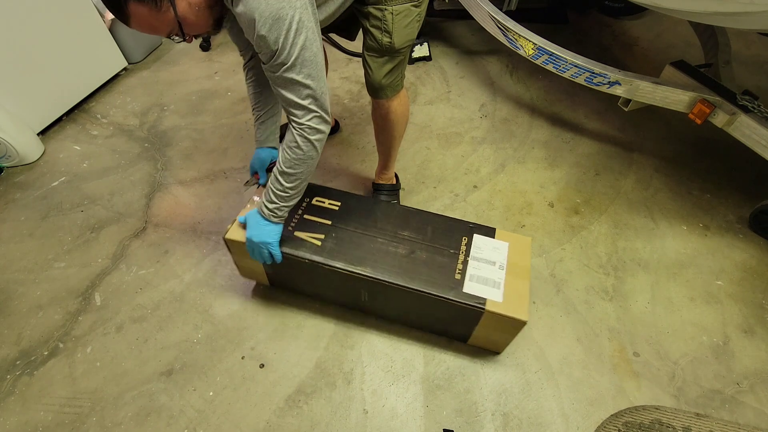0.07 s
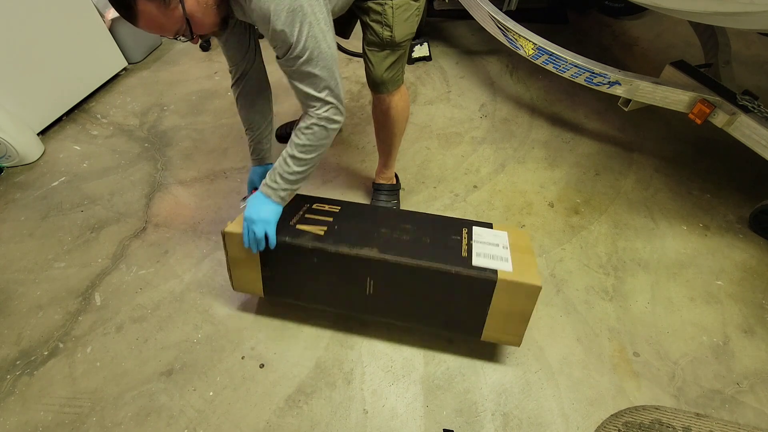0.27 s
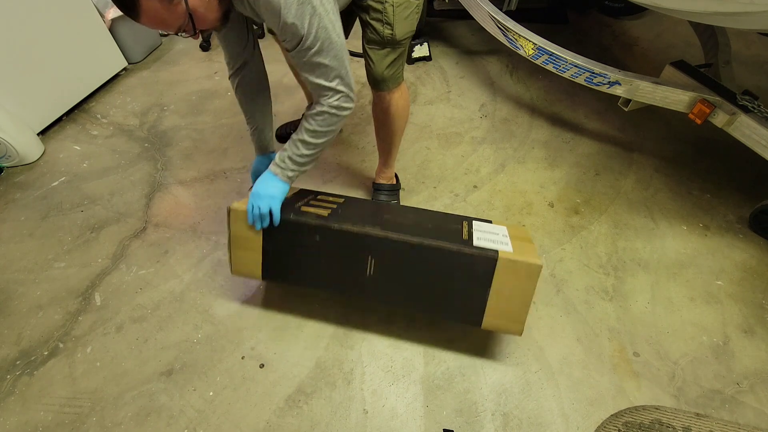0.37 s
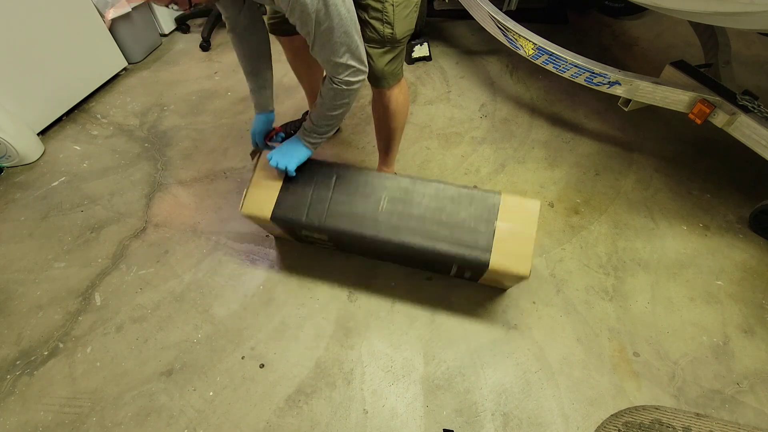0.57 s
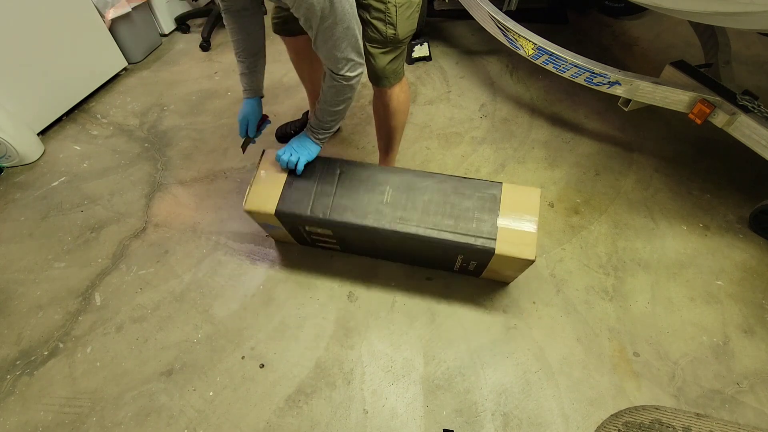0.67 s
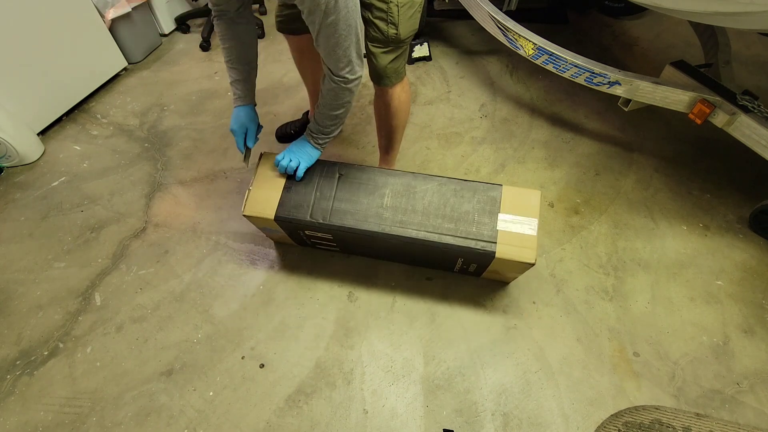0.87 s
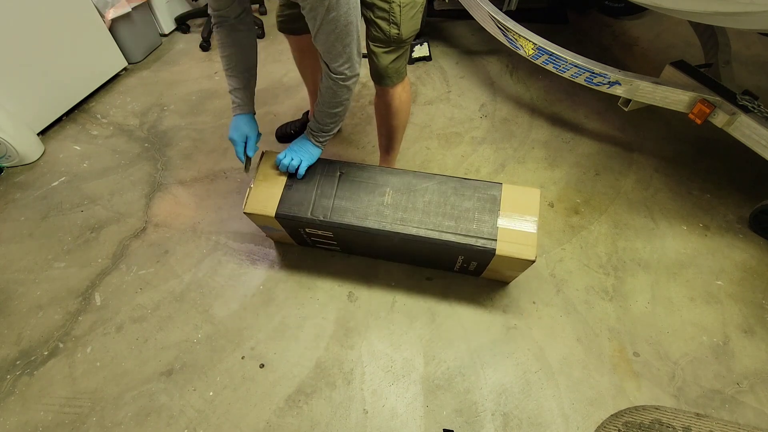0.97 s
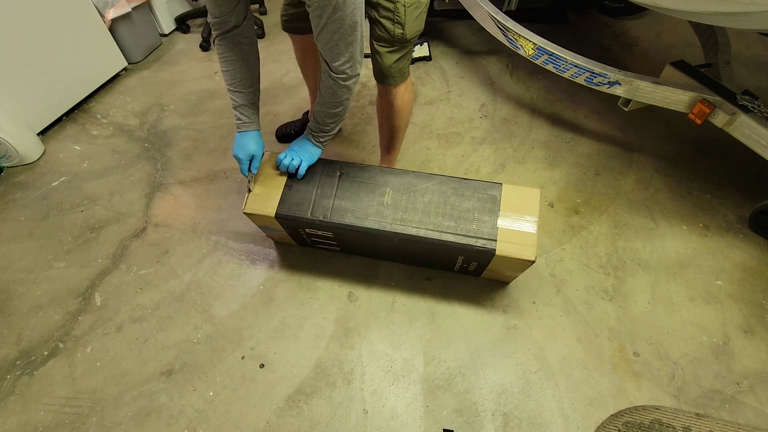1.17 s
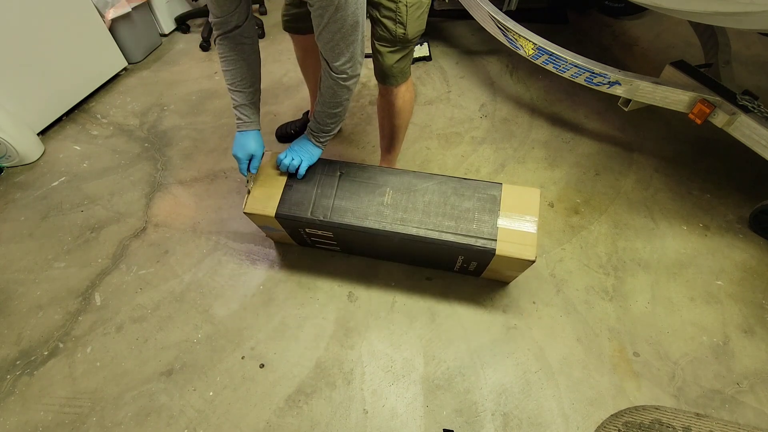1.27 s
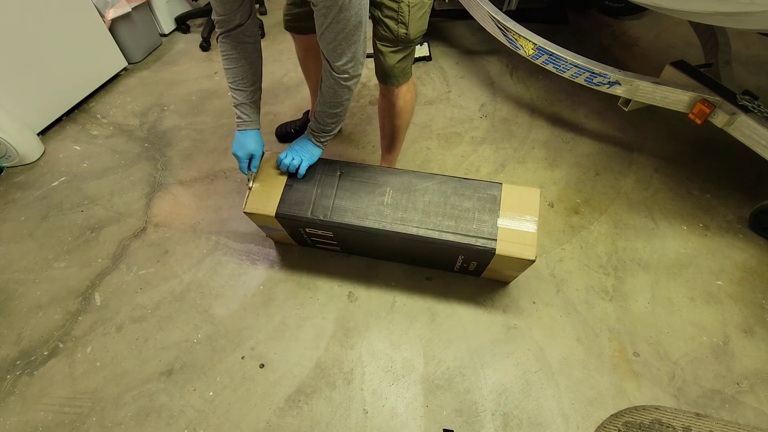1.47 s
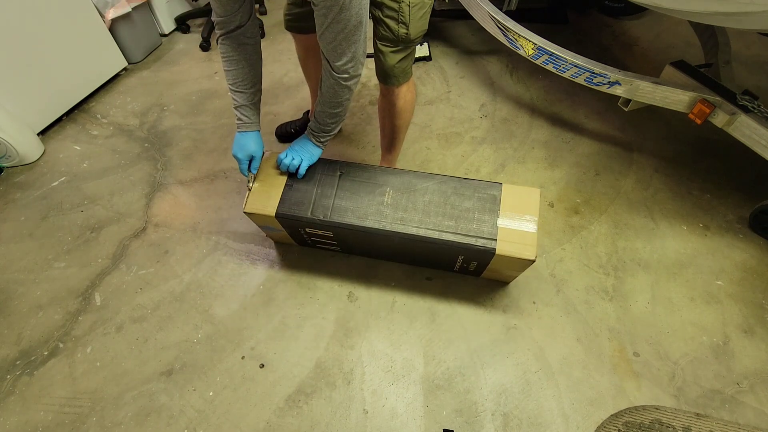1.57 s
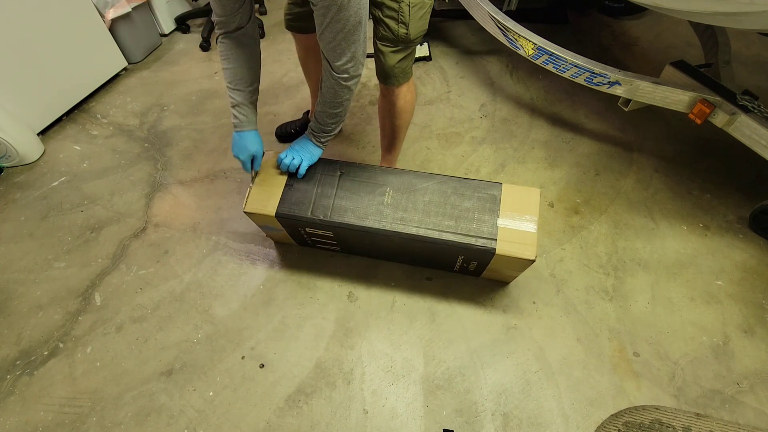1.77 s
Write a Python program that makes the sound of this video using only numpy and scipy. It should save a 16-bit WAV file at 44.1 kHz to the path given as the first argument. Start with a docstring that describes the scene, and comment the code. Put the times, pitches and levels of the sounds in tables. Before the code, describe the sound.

A cardboard box slaps down on its edge, slides under gloved hands and lands with a hollow thud in a hard-walled garage. Faint taps and blade skids come next, then tape begins tearing in tiny snaps over a quiet rumble.

```python
"""A garage with a concrete floor. A long cardboard box is rolled over: it slaps down on an edge, slides
under gloved hands with a hiss of catching fibres, tips and lands with a hollow thud of ringing walls
and squeezed air. Light knocks, ticks and skids follow as a blade is set to the tape and starts to tear
it in tiny snaps. The hard room rings briefly over a quiet rumble."""
import sys
import numpy as np
from scipy import signal
from scipy.fft import rfft, irfft, next_fast_len
from scipy.io import wavfile

SR = 44100
rng = np.random.default_rng(int(sys.argv[2]) if len(sys.argv) > 2 else 0)


def transcribe(u):
    """Save the signal u as a 16-bit wav file named by the first command-line argument.

    u: samples, shape (n,) or (channels, n), limited to [-1, 1]; the rate is SR.
    q: integer samples, one column per channel.
    """
    v = np.clip(np.atleast_2d(u).T, -1, 1)
    q = np.round(v * 32767).astype(np.int16)
    wavfile.write(sys.argv[1], SR, q)


N = 79380


def amp(db):
    """Decibels to gain."""
    return 10 ** (np.asarray(db) / 20)


def unit(x):
    """Scaled to rms 1."""
    return x / np.sqrt(np.mean(x ** 2) + 1e-20)


def along(points, hz):
    """A curve of (frequency, value) points read on a log axis."""
    freqs, values = np.transpose(points)
    return np.interp(np.log(hz + 1), np.log(freqs + 1), values)


def filtered(x, response):
    """x shaped by a frequency response."""
    n = x.shape[-1]
    size = next_fast_len(n + SR // 4)
    return irfft(rfft(x, size) * response(np.fft.rfftfreq(size, 1 / SR)), size)[..., :n]


def coloured(x, eq):
    """x through an EQ curve, at rms 1."""
    return unit(filtered(x, lambda hz: amp(along(eq, hz))))


def grains(rate, spread_db):
    """Tiny snaps at random times with log-normal sizes."""
    chance, size, sign = rng.random(N), rng.standard_normal(N), rng.choice([-1, 1], N)
    return (chance < rate / SR) * sign * amp(spread_db * size)


def add(track, start_s, sound):
    """Lay a sound into a track."""
    i = max(0, round(start_s * SR))
    track[..., i:i + sound.shape[-1]] += sound[..., :N - i]


# How alike the room is left and right: (frequency [Hz], correlation [0..1])
ROOM_LIKENESS = [(30, 0.59), (150, 1), (300, 0.18), (700, 0), (1500, 0), (15000, 0.069)]

def diffuse(pair):
    """Two unrelated signals become a room's left and right: centred bass, wide treble."""
    def mid_side_gains(hz):
        angle = np.arccos(np.clip(along(ROOM_LIKENESS, hz), -1, 1)) / 2
        return np.array([np.cos(angle), np.sin(angle)])
    mid, side = filtered(pair, mid_side_gains)
    return np.array([mid + side, mid - side])


# Reverb decay: (frequency [Hz], t60 [s])
ROOM_DECAY = [(50, 0.7), (200, 0.31), (1000, 0.44), (4000, 0.29), (8000, 0.36), (15000, 0.16)]
# Reverb against the direct sound: (frequency [Hz], level [dB])
ROOM_SEND = [(50, -16), (150, -6), (400, -2), (1200, -1.5), (3000, 2), (15000, 0)]
PREDELAY_S, LEFT_LEADS_S, BALANCE_DB = .0035, .00013, -0.5
ECHO_LEFT_S, ECHO_RIGHT_S, ECHO_DB = .0054, .0039, -11.5

def garage(x):
    """The direct sound, a first bounce off a nearby surface and a short tail from the hard walls."""
    hz, t, noise = signal.stft(diffuse(rng.standard_normal((2, SR // 2))), SR, nperseg=256)
    t60 = along(ROOM_DECAY, hz)[:, None]
    gain = amp(along(ROOM_SEND, hz))[:, None] * np.sqrt(2 * np.log(1000) / (t60 * SR))
    tail = signal.istft(noise * gain * np.exp(-np.log(1000) * t / t60), SR, nperseg=256)[1]
    tail = np.pad(tail, ((0, 0), (round(PREDELAY_S * SR), 0)))
    sides = np.array([[1], [-1]])
    direct = amp(BALANCE_DB * sides) * filtered(x, lambda f: np.exp(1j * np.pi * f * LEFT_LEADS_S * sides))
    echo = filtered(x, lambda f: np.exp(-2j * np.pi * f * np.array([[ECHO_LEFT_S], [ECHO_RIGHT_S]])))
    return direct + amp(ECHO_DB) * echo + signal.fftconvolve(x[None], tail, axes=1)[:, :len(x)]


# Room tone: (frequency [Hz], gain [dB])
RUMBLE_EQ = [(20, -13.5), (45, -1), (70, 3.5), (110, -6.5), (200, -2.5), (400, -12), (750, -10),
             (1200, -19.5), (3000, -23.5), (7000, -28), (9000, -39), (16000, -34.5)]

def room_tone(level_db=-64.5):
    """A steady bed of quiet, diffuse rumble."""
    return amp(level_db) * coloured(diffuse(rng.standard_normal((2, N))), RUMBLE_EQ)


def ring(modes, scatter_db, longest_t60_s=.28):
    """Struck resonances: damped sines of alternating sign, their levels varied on each call."""
    out, t = np.zeros(SR // 2), np.arange(SR // 2) / SR
    for k, (hz, db, t60) in enumerate(modes):
        decay = amp(db + scatter_db * rng.standard_normal() - 60 * t / min(t60, longest_t60_s))
        out += (-1) ** k * decay * np.sin(2 * np.pi * hz * t)
    return out


# The box's hollow body: (frequency [Hz], level [dB], t60 before ring's cap [s])
BOX_MODES = [(150.2, -4, 0.18), (179.3, -7.5, 0.32), (209.4, 1, 0.21), (253.4, 2, 0.14), (291.3, -6, 0.204),
             (320, -17, 0.171), (355.3, 0.5, .28), (465, -5, .18), (489.4, -10.5, 0.12), (556.3, -5.5, .2),
             (691.6, -5, 0.11), (747, -12.5, 0.1), (780, 2, 0.07), (880, -4, 0.2), (1102, -18, 0.13)]
# Air squeezed under and inside the box: (frequency [Hz], level [dB], t60 [s])
AIR_MODES = [(50.4, -7.5, 0.26), (72.7, -3.5, 0.16), (116.3, -2, 0.044)]
# Dense flexing of the walls: (frequency [Hz], gain [dB])
PANEL_EQ = [(60, -31), (150, 4), (400, 2), (800, -6), (1150, 0), (1600, -4), (3000, -25.5), (8000, -39)]
# Crushed card: (frequency [Hz], gain [dB])
CRUNCH_EQ = [(200, -22.5), (800, -11.5), (2500, -3.5), (4500, -3), (7200, -6.5), (9500, -14),
             (13000, -10.5), (16000, -16)]
# Hits on the box: (time [s], slap level [dB], slap pitch [Hz], hollow level [dB],
# hollow low-pass [Hz], thump level [dB], crunch level [dB])
BOX_HITS = [(0.0, -43, 273, -39, 577, -44.5, -41), (0.2203, -8, 451, -25.5, 1900, -32, -32.5),
            (0.2273, -25, 970, -39, 1980, -41, -54), (0.2296, -19, 470, -32, 900, -58, -45),
            (0.2340, -21, 132.4, -38, 406, -26.5, -57.5), (0.2440, -21.5, 240, -31.5, 500, -42, -56),
            (0.2537, -19, 146, -35, 260, -40, -41.5), (0.5704, -35.5, 495, -39, 1100, -39, -58),
            (0.5960, -34, 280, -41, 690, -32.5, -40.5), (0.6880, -35, 505, -37.5, 1013, -60, -41),
            (0.6950, -26.5, 209, -30.5, 400, -26.5, -43), (0.7112, -23.5, 227, -31, 900, -39, -37),
            (0.7190, -25, 80.8, -43, 397, -26, -56), (0.7430, -37, 125.7, -36.5, 350, -47, -64),
            (1.1140, -42, 357, -43.5, 706, -53, -52), (1.1400, -44, 169, -51, 497, -69, -70.5),
            (1.2391, -47.5, 793, -59, 1790, -78, -81), (1.2416, -44, 203.7, -62, 500, -72, -60.5),
            (1.5630, -50.5, 450, -55, 1200, -91.5, -76.5)]
SLAP_CYCLES, SLAP_BEND_CYCLES = 0.59, 0.73
MODES_DB, PANEL_DB, PANEL_T60_S, CRUNCH_T60_S = -8.5, 0.5, .11, 0.061
FIBRES_PER_S, FIBRE_SPREAD_DB = 9000, 4

def knocks():
    """Each blow slaps one wall, rings the hollow box, pushes out air and crushes a little card."""
    out, t = np.zeros((2, N)), np.arange(SR // 2) / SR
    for s, slap_db, slap_hz, hollow_db, lowpass_hz, thump_db, crunch_db in BOX_HITS:
        cycles = slap_hz * t
        age = cycles / SLAP_CYCLES  # the slap's envelope peaks at 1
        bend = SLAP_BEND_CYCLES * (1 - np.exp(-age))  # starts sharp, falls toward its pitch
        slap = -age * np.exp((1 - age ** 2) / 2) * np.sin(2 * np.pi * (cycles + bend))
        panels = coloured(rng.standard_normal(len(t)), PANEL_EQ) * amp(PANEL_DB - 60 * t / PANEL_T60_S)
        hollow = (panels + amp(MODES_DB) * ring(BOX_MODES, scatter_db=2)) * (1 - np.exp(-t / 0.0017))
        hollow = signal.lfilter(*signal.butter(2, lowpass_hz, fs=SR), hollow)
        thump = ring(AIR_MODES, scatter_db=3.5) * (1 - np.exp(-t / 0.0036))
        fibres = grains(FIBRES_PER_S, FIBRE_SPREAD_DB)[:len(t)]
        crunch = coloured(fibres, CRUNCH_EQ) * amp(-60 * t / CRUNCH_T60_S)
        hit = amp(slap_db) * slap + amp(hollow_db) * hollow + amp(thump_db) * thump
        add(out, s, garage(hit + amp(crunch_db) * crunch))
    return out


# Bright surface friction: (frequency [Hz], gain [dB])
HISS_EQ = [(300, -20.5), (1500, -14.5), (2600, -4.5), (4200, -4.5), (6200, 0), (7400, 0.5), (8600, -10),
           (11000, -6.5), (12800, -6), (16000, -6)]
# The walls' dull answer: (frequency [Hz], gain [dB])
BODY_EQ = [(80, -32.5), (200, -1.5), (350, -5.5), (570, 1.5), (900, -0.5), (1450, -5.5), (1590, -7),
           (1720, -3.5), (2400, -7), (5000, -12), (12000, -36)]
# Card sliding on gloves and floor: (peak time [s], rise [s], fall [s], hiss level [dB], body level [dB])
STROKES = [(0.005, 0.035, 0.015, -109, -51), (0.083, 0.064, 0.041, -46, -50.5),
           (0.217, 0.043, 0.05, -52.5, -45.5), (0.323, 0.016, 0.072, -47, -46.5),
           (0.41, 0.054, 0.056, -42, -41), (0.541, 0.012, 0.009, -51, -56),
           (0.618, 0.047, 0.027, -52, -44.5), (0.714, 0.039, 0.026, -47.5, -43.5),
           (1.49, 0.016, 0.043, -86, -85), (1.605, 0.11, 0.079, -76.5, -70.5)]
SING_HZ, SING_WIDTH_HZ, SING_DB = 1556, 31, -14

def slides(patches=6):
    """Fibres catch and slip as each stroke swells and fades; a stiff edge sings as it is rubbed."""
    t, hiss, body = np.arange(N) / SR, np.zeros(N), np.zeros(N)
    for peak_s, rise, fall, hiss_db, body_db in STROKES:
        speed = np.exp(-((t - peak_s) / np.where(t < peak_s, rise, fall)) ** 2)
        hiss += amp(hiss_db) * speed
        body += amp(body_db) * speed
    slips = lambda: grains(FIBRES_PER_S / patches, FIBRE_SPREAD_DB)
    rub = sum(garage(hiss * coloured(slips(), HISS_EQ) + body * coloured(slips(), BODY_EQ))
              for _ in range(patches))
    edge = unit(signal.lfilter(*signal.iirpeak(SING_HZ, SING_HZ / SING_WIDTH_HZ, fs=SR), slips()))
    return rub / np.sqrt(patches) + garage(amp(SING_DB) * body * edge)


# Sharp ticks of blade, tape and card: (time [s], level [dB], low-pass [Hz])
TICK_CUES = [(0.2205, -29.5, 15000), (0.2262, -30.5, 9000), (0.536, -50.5, 14000), (0.709, -39, 10100),
             (0.715, -51, 14000), (0.874, -49, 6100), (1.114, -64, 11000), (1.134, -47.5, 9000),
             (1.138, -50, 16000), (1.2457, -57.5, 18000), (1.254, -64, 18000), (1.468, -52, 7560),
             (1.485, -67, 6000), (1.604, -68.5, 16000), (1.702, -44.5, 8000), (1.762, -35, 16000),
             (1.774, -36, 8800), (1.797, -30, 14000)]

def ticks(t60_s=0.015):
    """Short, crisp snaps, each with its own loudness and brightness."""
    out, t = np.zeros(N), np.arange(SR // 8) / SR
    for s, db, lowpass_hz in TICK_CUES:
        snap = coloured(rng.standard_normal(len(t)), CRUNCH_EQ) * amp(db - 60 * t / t60_s)
        add(out, s, signal.lfilter(*signal.butter(2, lowpass_hz, fs=SR), snap))
    return garage(out)


# Midrange scratch of blade on card: (frequency [Hz], gain [dB])
SKID_EQ = [(200, -20), (500, 8), (1000, -7), (1700, -1), (2400, 2.5), (3200, -2.5), (4200, -5),
           (15000, -38)]
# Blade skids: (time [s], level [dB])
SKID_CUES = [(1.123, -54), (1.563, -53)]
TEARS_PER_S, TEAR_SPREAD_DB = 3200, 5.5

def blade_skids(t60_s=0.053):
    """The blade catches in the card and skids briefly."""
    out, t = np.zeros(N), np.arange(N) / SR
    for s, db in SKID_CUES:
        add(out, s, coloured(grains(TEARS_PER_S, TEAR_SPREAD_DB), SKID_EQ) * amp(db - 60 * t / t60_s))
    return garage(out)


# Rasp of tearing tape: (frequency [Hz], gain [dB])
TAPE_EQ = [(150, -31), (500, -7.5), (800, -9.5), (1300, -2.5), (3200, 2.5), (5000, 0), (7300, -6.5),
           (9500, -8), (15000, -11)]
# The cut's envelope, following the force on the blade: (time [s], level [dB])
CUT_ENVELOPE = [(1.66, -102.5), (1.698, -64), (1.704, -53.5), (1.751, -48), (1.759, -47), (1.778, -37),
                (1.8, -53)]

def tape_cut(spots=3, ring_db=-1, ring_exponent=2.15, ring_lowpass_hz=310):
    """The blade tears the tape in small snaps; pressed harder, it rings the box's low modes."""
    times, db = np.transpose(CUT_ENVELOPE)
    force = amp(np.interp(np.arange(N) / SR, times, db - db.max()))
    out = np.zeros((2, N))
    for _ in range(spots):
        tears = grains(TEARS_PER_S / spots, TEAR_SPREAD_DB)
        box = signal.fftconvolve(tears, ring(BOX_MODES, scatter_db=4))[:N]
        box = unit(signal.lfilter(*signal.butter(1, ring_lowpass_hz, fs=SR), box))
        out += garage(force * coloured(tears, TAPE_EQ) + amp(ring_db) * force ** ring_exponent * box)
    return amp(db.max()) * out / np.sqrt(spots)


def scene():
    """Box and blade over the garage's quiet rumble."""
    return room_tone() + knocks() + slides() + ticks() + blade_skids() + tape_cut()


TOP_HZ = 15830

def record(dry):
    """A steep high cut on the mix, fading out across 200 Hz."""
    return filtered(dry, lambda hz: np.clip((TOP_HZ - hz) / 200 + .5, 0, 1))


dry = scene()
out = record(dry)
transcribe(out)
```